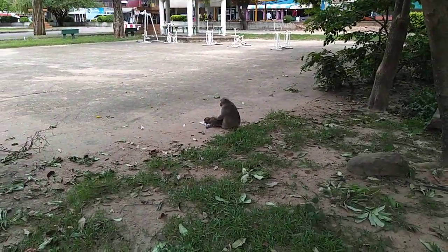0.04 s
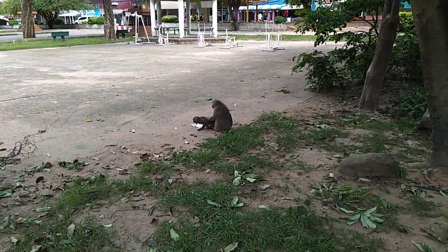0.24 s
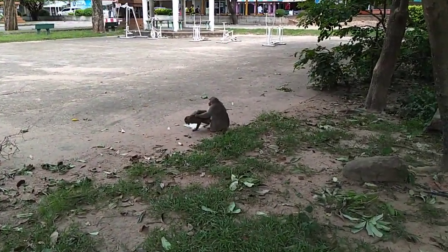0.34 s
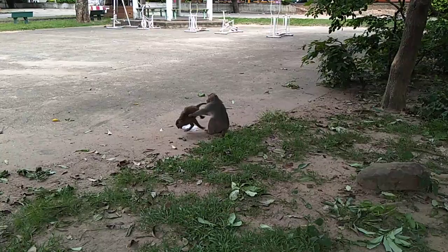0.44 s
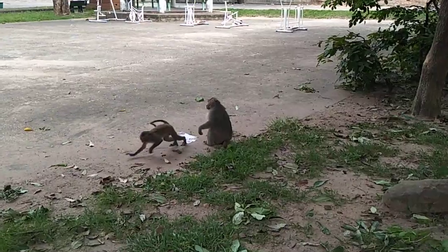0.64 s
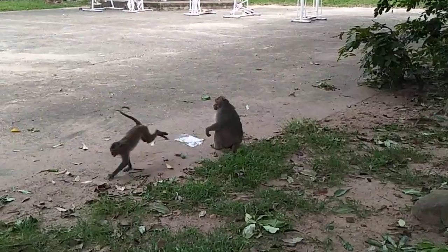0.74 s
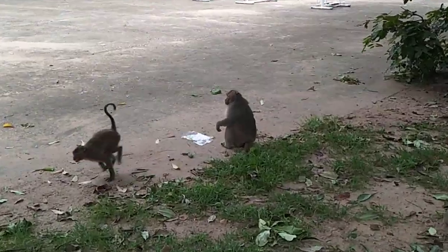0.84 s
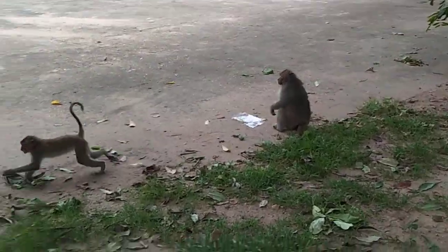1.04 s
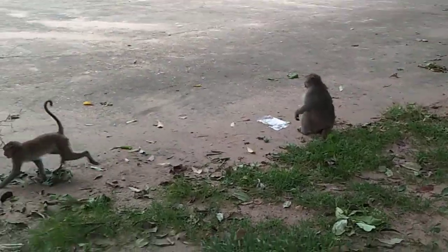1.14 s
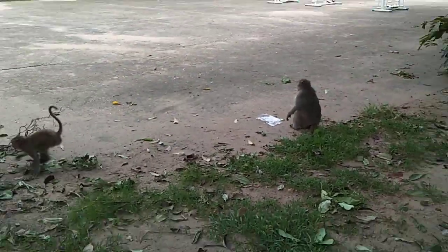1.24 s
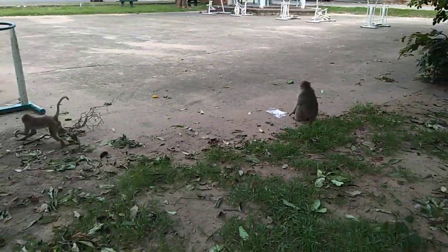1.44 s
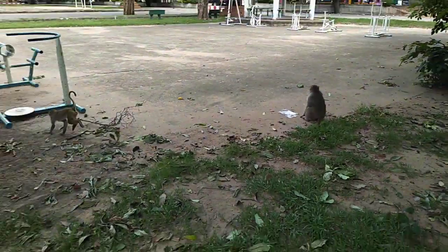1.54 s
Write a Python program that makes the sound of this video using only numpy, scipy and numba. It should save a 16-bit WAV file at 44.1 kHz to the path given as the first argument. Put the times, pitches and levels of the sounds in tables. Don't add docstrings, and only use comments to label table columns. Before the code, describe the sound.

A single short, harsh monkey shriek bursts out early and echoes off buildings around an open yard; then light feet rustle dry leaves and snap twigs over faint traffic rumble and an idling engine.

```python
import sys
import numpy as np
from scipy import signal
from scipy.fft import rfft, irfft
from scipy.io import wavfile
from scipy.ndimage import uniform_filter1d, minimum_filter1d
from numba import njit

SR = 44100
rng = np.random.default_rng(int(sys.argv[2]) if len(sys.argv) > 2 else 0)


def elevation(decibels):
    levels = np.asarray(decibels, float)
    return 10 ** (levels / 20)


def bounce(signal):
    frames = np.transpose(np.atleast_2d(signal))
    limited = np.clip(frames, -1, 1)
    pcm = np.round(limited * 32767).astype(np.int16)
    wavfile.write(sys.argv[1], SR, pcm)


N = 70560

# (time [s], level [dB], chaos [0-1, more is held at 1])
SHRIEK = [
    (.183, -39, 1.2),
    (.2, -27, 1.14),
    (.222, -19, 0.91),
    (.25, -13.5, 0.85),
    (.36, -10.5, 0.89),
    (.43, -10.5, 1.01),
    (.465, -10.5, 0.74),
    (.495, -15, 0.79),
    (.56, -32, 0.8),
]
# (time [s], mouth [Hz], front of mouth [Hz], fold beats [Hz])
MOUTH = [
    (.19, 4550, 5950, 2080),
    (.27, 4620, 6050, 2180),
    (.31, 4620, 6180, 2160),
    (.36, 4520, 5850, 2230),
    (.43, 4380, 5680, 2340),
    (.456, 4550, 5600, 2360),
    (.46, 4870, 6180, 2420),
    (.49, 4870, 6180, 2460),
    (.497, 4500, 6170, 2460),
]


def level(x, db):
    return x * elevation(db) / np.sqrt(np.mean(x ** 2))


def curve(table, col):
    rows = np.array(table, float)
    return np.interp(np.arange(N) / SR, rows[:, 0], rows[:, col])


def walk(rate):
    hold = int(SR / rate)
    steps = np.repeat(rng.standard_normal(N // hold + 1), hold)
    return 1.3 * uniform_filter1d(uniform_filter1d(steps, hold), hold)[:N]


def colour(x, table):
    rows = np.array(table, float)
    hz = np.arange(N // 2 + 1) * SR / N + 1
    db = np.interp(np.log(hz), np.log(rows[:, 0]), rows[:, 1], -80, -80)
    return irfft(rfft(x) * elevation(db), N)


@njit
def svf(x, hz, width):
    y, b, l = np.empty(len(x)), 0., 0.
    for i in range(len(x)):
        g, k = np.tan(np.pi * hz[i] / SR), width / hz[i]
        v = (b + g * (x[i] - l)) / (1 + g * (g + k))
        b, l, y[i] = 2 * v - b, l + 2 * g * v, k * v
    return y


def band(x, hz, width_hz):
    hz = np.clip(hz + np.zeros(N), 20, .45 * SR)
    return svf(svf(x, hz, 1.45 * width_hz), hz, 1.52 * width_hz)


def surroundings():
    # (frequency [Hz], level per Hz [dB])
    yard = [(180, -25.5), (300, -11), (372, -4.5), (553, -3.5), (696, -7), (1560, -10.5), (1730, -11),
            (6900, -15.5), (15500, -55)]
    hiss = level(colour(rng.standard_normal(N), yard), -42) * elevation(.5 * walk(1))

    # (frequency [Hz], level per Hz [dB])
    road = [(15, -49), (25, -22), (60, -4.5), (144, 4.5), (178, -0.5), (209, -2), (306, -10.5), (336, -23),
            (400, -43), (520, -68), (880, -120)]
    rumble = level(colour(rng.standard_normal(N), road), -38) * elevation(1 * walk(17))

    # (multiple of its turning rate, level [dB])
    engine = [(1.5, -0.5), (2, -1), (3, 2.5), (4, -3.5), (5, -9.5), (6, -10), (10, -22.5), (11, -24),
              (12, -12)]
    engine_hz, engine_db, flutter_db = 50.73, -45.5, 3
    turn = 2 * np.pi * np.cumsum(engine_hz * (1 + 0.01468 * walk(5))) / SR
    hum = 0
    for k, db in engine:
        hum = hum + np.sin(k * turn + k * k) * elevation(engine_db + db + flutter_db * walk(14))

    whine_s, length_s, whine_hz, drop_hz_per_s = .94, .05, 1500, 700
    t = np.arange(N) / SR - whine_s
    tone = np.sin(2 * np.pi * (whine_hz - drop_hz_per_s * t / 2) * t)
    whine = elevation(-53) * np.exp(-(t / length_s) ** 2) * tone
    return hiss + rumble + hum + whine


def scuffs():
    # (time [s], length [s], level [dB], brightness [dB])
    steps = [(.0, 0.018, -43.5, 8.5), (0.693, 0.019, -34, -10), (.74, 0.022, -39, -3),
             (0.984, 0.011, -42, 3), (1.069, 0.021, -40.5, 4), (1.089, .035, -38, 1),
             (1.119, 0.026, -33.5, 7), (1.156, 0.018, -42.5, 10.5), (1.206, 0.043, -42, 6),
             (1.227, 0.028, -34.5, 2), (1.257, 0.042, -31.5, -1.5), (1.326, 0.033, -34, 6.5),
             (1.374, .07, -47, 10.5), (1.454, 0.14, -54.5, 5)]
    # (frequency [Hz], level per Hz [dB])
    leaves = [(710, -57), (1200, -10.5), (1450, -37), (2410, -12), (4690, -3), (5210, -12), (6580, -6.5),
              (7630, -18), (15000, -42)]
    grains_per_s, scatter_db, bright_hz = 3000, 2.5, 7950
    rise_s, edge_s = 0.011, 0.029

    luck = rng.random((3, N))
    crack_size = elevation(-scatter_db * np.log(luck[1] + 0.0067))
    grains = (luck[0] < grains_per_s / SR) * crack_size * np.sign(luck[2] - .5)
    rubbing = level(rng.standard_normal(N), 0.9)
    crackle = level(colour(level(grains, 0) + rubbing, leaves), 0) * elevation(1.05 * walk(59.9))
    dull = signal.sosfiltfilt(signal.butter(2, bright_hz, fs=SR, output="sos"), crackle)

    t, out = np.arange(N) / SR, 0
    for s, length_s, db, bright_db in steps:
        press = np.clip((t - s) / rise_s, 0, 1)
        press = press * np.exp(-np.clip(t - s - length_s, 0, None) / edge_s)
        out = out + elevation(db) * press * (dull + elevation(bright_db) * (crackle - dull))
    return out


def snaps():
    # (time [s], peak level [dB], pitch [Hz], time to ring down by 60 dB [s])
    twigs = [
        (.0795, -31, 3500, .004),
        (.083, -27, 1100, .008),
        (1.076, -27, 9000, .0015),
        (1.1266, -13.5, 4400, .006),
        (1.2366, -22, 4560, .006),
        (1.267, -20, 4650, .008),
        (1.295, -21, 5500, .004),
        (1.3377, -18, 4530, .015),
        (1.3489, -14, 5000, .005),
        (1.5594, -33, 6000, .005),
    ]
    rise_s, tick_db = .00012, -32
    out, t = np.zeros(N + 2000), np.arange(2000) / SR
    for s, db, hz, t60 in twigs:
        rise = np.minimum(1, t / np.minimum(rise_s, t60 / 20))
        ring = np.sin(2 * np.pi * hz * t) * np.exp(-np.log(1000) * t / t60) * rise
        tick = elevation(tick_db) * np.diff(rng.standard_normal(len(t) + 1)) * np.exp(-t / 0.00037)
        start = int(s * SR)
        out[start:start + len(t)] += elevation(db) * (ring + tick)
    return out[:N]


def folds():
    wander, jitter, weak_pulse = .022, .1, .25
    turns = np.cumsum(curve(MOUTH, 3) * (1 + wander * walk(150))) / SR
    beat = np.arange(1, int(turns[-1]) - 9)
    at = np.interp(beat, turns, np.arange(N))
    chaos = np.clip(curve(SHRIEK, 2)[at.astype(int)], 0, 1)
    luck = rng.standard_normal((N // 8, 2))[beat].T
    at = np.clip(at + jitter * chaos * luck[0] * np.gradient(at), 8, N - 9)
    orderly = np.where(beat % 2, 1, weak_pulse)
    size = np.sqrt(1 - chaos ** 2) * orderly + chaos * luck[1]

    near = at.astype(int)[:, None] + np.arange(-7, 9)
    lag = near - at[:, None]
    taps = size[:, None] * np.sinc(lag) * np.cos(np.pi * lag / 16) ** 2
    return np.bincount(near.ravel(), taps.ravel(), N)


def shriek():
    # (time [s], throat [dB], mouth [dB], front of mouth [dB])
    balance = [
        (.19, -16, -3.5, -9),
        (.25, -8.5, 2.5, -2),
        (.30, -4, -3, 0.5),
        (.36, -11, 1, 4),
        (.43, -10.5, -0.5, -8.5),
        (.47, -5.5, -2.5, -0.5),
        (.53, -3.5, -9, -4),
    ]
    # (frequency [Hz], width [Hz], level with jaw open [dB], level with jaw closed [dB])
    cavities = [(1150, 200, -30, -32), (1650, 300, -15, -27), (2950, 700, -11, -21), (3500, 500, -16, -17),
                (4200, 500, -14, -6), (5250, 900, -6, -6), (7000, 900, -9, -18), (8500, 1300, -18, -27),
                (11300, 1300, -29, -33), (13400, 1500, -36, -55), (15300, 500, -40, -42)]
    # (frequency [Hz], level [dB])
    cry_colour = [(20, -14), (1200, -5.5), (1600, -1), (12000, 0), (13000, -4), (14200, -9), (15000, -1),
                  (22050, 0)]
    # (starts closing [s], is closed [s])
    closing = (0.31, 0.44)
    swell_db, quiver = 2, .012
    puffs, t = folds(), np.arange(N) / SR

    def ring(hz, width_hz, db):
        swell = elevation(db + swell_db * walk(91.1))
        return swell * band(puffs, hz * (1 + quiver * walk(70.1)), width_hz)

    throat = ring(curve(MOUTH, 3), 300, curve(balance, 1))
    mouth = ring(curve(MOUTH, 1), 320, curve(balance, 2))
    front = ring(curve(MOUTH, 2), 300, curve(balance, 3))
    voice = throat + mouth + front
    for hz, width_hz, open_db, shut_db in cavities:
        db = np.interp(t, closing, (open_db, shut_db)) + 2.8 * walk(41.2)
        late_puffs = np.roll(puffs, int(hz / 20))
        voice = voice + elevation(db) * band(late_puffs, hz, width_hz)

    fade = np.exp(-np.clip(t - SHRIEK[-1][0], 0, None) / .015) * (t > SHRIEK[0][0])
    return level(colour(voice, cry_colour), 0) * elevation(curve(SHRIEK, 1)) * fade


@njit
def walls(x, lags, gain, damp):
    line, soft, out = np.zeros((8, 8192)), np.zeros(8), np.zeros(len(x))
    for i in range(len(x)):
        total = 0.
        for k in range(8):
            soft[k] += (1 - damp) * (gain[k] * line[k, (i - lags[k]) & 8191] - soft[k])
            total += soft[k]
            out[i] += soft[k] * (1 - 2 * (k % 2))
        for k in range(8):
            line[k, i & 8191] = x[i] + soft[k] - total / 4
    return out


def echo(near):
    # (frequency [Hz], level [dB])
    wall_colour = [(20, 0), (1500, 0), (2450, 1), (3500, -1), (5000, -1), (6200, -1), (11000, 0),
                   (22050, 0)]
    t60_s, damp, echo_db = 0.6, 0.15, -17.5
    lags = rng.integers(700, 5000, size=8)
    bounced = walls(near, lags, elevation(-60 * lags / SR / t60_s), damp)
    return elevation(echo_db) * colour(bounced, wall_colour)


def scene():
    background = surroundings()
    near = scuffs() + snaps() + shriek()
    return (near + echo(near) + background)[None]


def top_cut(x):
    return signal.sosfilt(signal.butter(12, 15650, fs=SR, output="sos"), x)


def record(dry):
    ceiling = .92
    need = np.minimum(1, ceiling / (np.abs(dry) + 1e-9))
    gain = uniform_filter1d(minimum_filter1d(need, size=133), size=131)
    return top_cut(dry * gain)


dry = scene()
out = record(dry)
bounce(out)
```